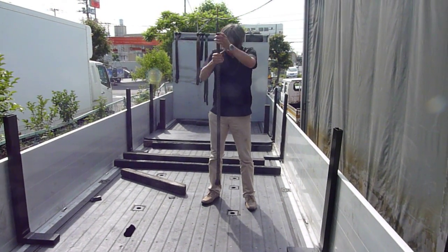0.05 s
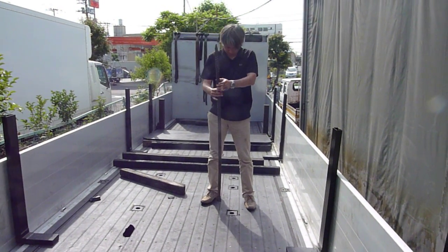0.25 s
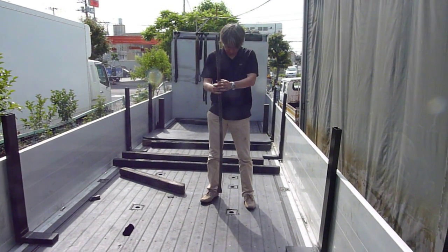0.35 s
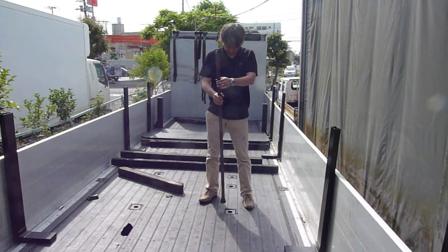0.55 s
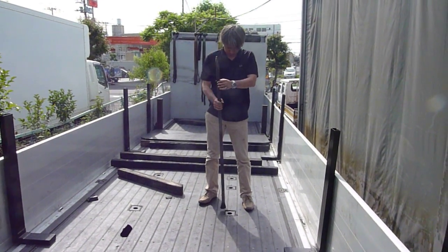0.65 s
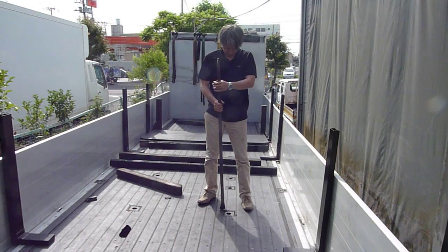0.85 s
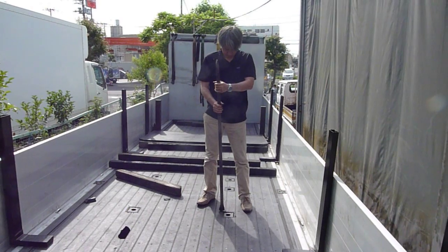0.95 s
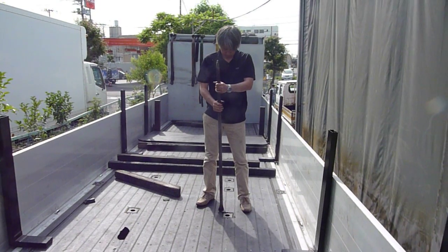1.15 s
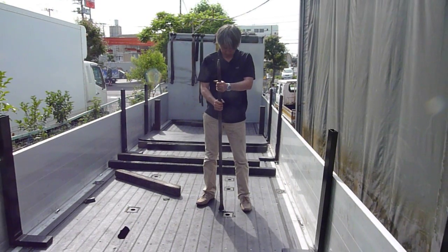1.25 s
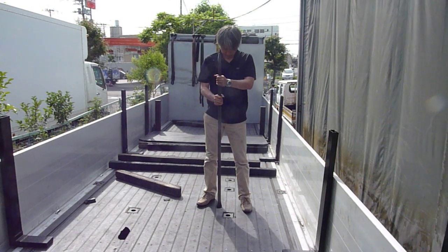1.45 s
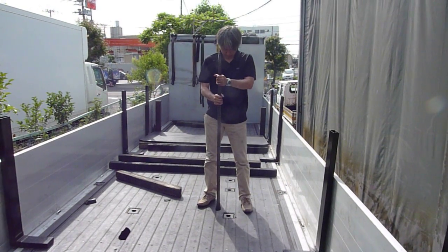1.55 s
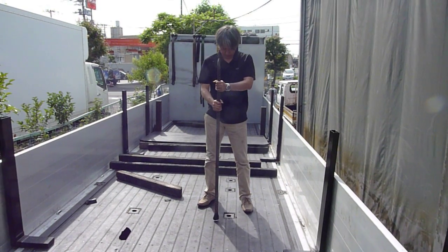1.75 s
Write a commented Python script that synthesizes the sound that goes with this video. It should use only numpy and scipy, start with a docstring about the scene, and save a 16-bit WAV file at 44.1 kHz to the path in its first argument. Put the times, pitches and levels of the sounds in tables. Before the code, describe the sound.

Two sharp, ringing clangs come in quick succession as a metal bar hits an open truck bed, close to the microphone. The panels shudder, the bar bounces with softer knocks, and far street traffic rumbles quietly behind.

```python
"""An empty truck bed by a street. A long steel bar is slammed twice, end first, onto the floor;
lighter knocks follow as the bar bounces and the bed settles. Each blow thumps the floor, cracks
steel on steel, sets the panels shuddering and leaves the bar ringing. The close microphone overloads,
and the recorder's recovering gain, written into the envelopes, holds up the ring after each blow.
Distant traffic with a faint whine and one small bird lie behind."""
import sys
import numpy as np
from scipy import signal
from scipy.fft import rfft, irfft
from scipy.io import wavfile

SR = 44100
rng = np.random.default_rng(int(sys.argv[2]) if len(sys.argv) > 2 else 0)


def waveform_to_disk(signal):
    """Save audio, clipped to [-1, 1], as 16-bit WAV at the path in sys.argv[1]."""
    frames = np.transpose(np.atleast_2d(signal))
    scaled = np.clip(frames, -1, 1) * 32767
    samples = np.round(scaled).astype(np.int16)
    wavfile.write(sys.argv[1], SR, samples)


N = 79380
T = np.arange(N) / SR
HZ = np.maximum(np.arange(N // 2 + 1) * SR / N, 1)
BAND_EDGES_HZ = np.geomspace(22, 9000, 22)
BAND_HZ = np.sqrt(BAND_EDGES_HZ[1:] * BAND_EDGES_HZ[:-1])


def from_db(db):
    """Decibels to gain."""
    return 10 ** (np.asarray(db) / 20)


def unit_rms(x):
    """Scale to rms 1."""
    return x / np.sqrt(np.mean(x ** 2) + 1e-20)


def at_hz(table, hz):
    """Read a table on a log-frequency axis."""
    table_hz, values = np.transpose(table)
    return np.interp(np.log(hz), np.log(table_hz), values)


def drift(rate_hz):
    """Smooth random motion, rms 1."""
    return unit_rms(irfft(rfft(rng.standard_normal(N)) / (1 + (HZ / rate_hz) ** 2), N))


def decay(start, t60):
    """Sudden onset, exponential decay."""
    return (T >= start) * from_db(-np.minimum(60 * np.maximum(T - start, 0) / t60, 200))


# Stereo width: (frequency [Hz], side minus mid [dB])
WIDTH = [(60, -21), (100, -28), (180, -27.5), (310, -30), (530, -23.5), (910, -15), (1570, -8.5),
         (2700, -5.5), (4650, -3.5), (8010, 0.5)]
# Stereo balance: (frequency [Hz], left minus right [dB])
BALANCE = [(100, 0.72), (1000, .6), (2000, 1), (4000, -0.5), (8000, 0)]

def stereo(mid, side, hz):
    """Mid and side to left and right; wider in the treble."""
    sign = np.array([[1], [-1]])
    return (mid + sign * side * from_db(at_hz(WIDTH, hz))) * from_db(sign * at_hz(BALANCE, hz) / 2)


def noise(gains):
    """Stereo noise shaped by a gain per frequency, rms 1."""
    mid, side = rfft(rng.standard_normal((2, N))) * gains
    return unit_rms(irfft(stereo(mid, side, HZ), N))


# Traffic spectrum: (frequency [Hz], relative density [dB])
TRAFFIC_SPECTRUM = [(15, -62), (25, -14), (60, -4), (146, -3.5), (331, -4.5), (411, -5.5), (475, -11),
                    (650, -12.5), (699, -10), (980, -15.5), (1370, -24), (4820, -36.5), (5440, -45),
                    (6760, -37), (8000, -54), (10400, -66), (17600, -120)]

def traffic(start_db=-42, fade_db_per_s=1):
    """Distant traffic rumbles, slowly fading."""
    return from_db(start_db - fade_db_per_s * T) * noise(from_db(at_hz(TRAFFIC_SPECTRUM, HZ)))


# Whine envelope: (time [s], level [dB])
WHINE_ENVELOPE = [(0, -50.5), (.2, -64), (1.1, -57.5), (1.22, -49), (1.44, -58), (1.58, -51), (1.8, -56.5)]

def whine(pitch_hz=966, waver=.004):
    """A faint, far tone wavers in pitch."""
    hz = pitch_hz * (1 + waver * drift(rate_hz=52))
    level_db = np.interp(T, *np.transpose(WHINE_ENVELOPE))
    return from_db(level_db) * np.sin(2 * np.pi * np.cumsum(hz) / SR)


# Floor modes: (frequency [Hz], blow 1 relative level [dB], blow 2 relative level [dB], t60 [s])
FLOOR_MODES = [(75, -38, -38, 0.054), (180.5, -24, -4.5, 0.081), (242.7, -9.5, 2.5, 0.067),
               (292, -3.5, -40, 0.039), (416, -43, -8, 0.047), (859, -5, -16, 0.036),
               (1015, -4.5, -36, 0.035), (1110, -18.5, -26.5, 0.04), (1990, -1, -2.5, 0.0073),
               (2630, 0.5, -13, .0022)]

def floor_thump(start, blow, contact_s=.0002):
    """The floor is pushed down and swings back in a few heavily damped modes."""
    age = np.maximum(T - start, 0)
    thump = 0
    for hz, *levels_db, t60 in FLOOR_MODES:
        thump -= from_db(levels_db[blow]) * np.sin(2 * np.pi * hz * age) * decay(start, t60)
    attack = 1 - np.exp(-age / contact_s)
    return stereo(thump * attack, side=0, hz=FLOOR_MODES[0][0])


# Steel impact spectrum: (frequency [Hz], relative density [dB])
CRACK_SPECTRUM = [(100, 14), (600, 5), (1400, -5), (2100, -0.5), (3300, -1.5), (4500, -14), (6500, -18),
                  (8000, -33.5)]

def crack(start, clatter_db=-6):
    """Steel meets steel: a sharp crack and a brief clatter."""
    envelope = decay(start, t60=.018) + from_db(clatter_db) * decay(start, t60=.11)
    return noise(from_db(at_hz(CRACK_SPECTRUM, HZ))) * envelope


def panel_modes(relative_spacing=.008, noise_share=.5):
    """Gain per frequency: hundreds of close, random panel modes over even noise."""
    density = np.minimum(SR / N / (relative_spacing * HZ), 1)
    is_mode = rng.random(len(HZ)) < density
    return np.sqrt(noise_share + (1 - noise_share) * is_mode / density)


# Panel spectrum: (frequency [Hz], relative density [dB])
PANEL_SPECTRUM = [(30, -39), (55, -1), (110, -0.5), (170, -1.5), (290, 3), (450, -5), (750, -8),
                  (1200, -13), (2200, -23.5), (3500, -27.5), (5000, -33), (7500, -41.5)]
# Apparent panel decay while the recorder's gain recovers: (frequency [Hz], t60 [s])
APPARENT_DECAY = [(60, 4), (250, 1.6), (800, 1.24), (2500, 1.35), (7000, 1.02)]

def panel_shudder(modes, start, colour_db, recovery_s, attack_s=.0074, fall_db_per_s=76, rattle_db=1.34):
    """Panels shudder and rattle; recovering recorder gain holds them up, then they fall to a yard echo."""
    age = np.maximum(T - start, 0)
    fall = from_db(-fall_db_per_s * np.maximum(age - recovery_s, 0))
    rattle = from_db(rattle_db * drift(rate_hz=95))
    yard_echo = from_db(-16) * decay(start, t60=.97)
    gains = from_db(at_hz(PANEL_SPECTRUM, BAND_HZ) + colour_db) * np.sqrt(np.diff(BAND_EDGES_HZ))
    gains /= np.linalg.norm(gains)
    out = 0
    for low, high, hz, gain in zip(BAND_EDGES_HZ, BAND_EDGES_HZ[1:], BAND_HZ, gains):
        band = noise(modes * (HZ >= low) * (HZ < high))
        shudder = decay(start, at_hz(APPARENT_DECAY, hz)) * fall * rattle
        out += gain * band * np.hypot(shudder, yard_echo)
    return out * (1 - np.exp(-age / attack_s))


# Bar modes: (frequency [Hz], blow 1 relative peak [dB], blow 2 relative peak [dB],
# gain recovery [s], t60 [s])
BAR_MODES = [(1796, -51, -37, .18, .62), (1895, -59, -43, .24, .45), (2207, -50, -43, .18, .55),
             (2832, -55, -49, .05, .45), (3138, -56, -48, .12, .55), (3534, -44, -48, .36, .65),
             (3666, -55, -47, .22, .38), (3943, -51, -61, .33, .35), (4188, -68, -52, .21, .3),
             (4560, -55, -68, .28, .4), (4760, -53, -50, .09, .5), (5277, -41, -59, .14, .75),
             (5846, -55, -68, .16, .65), (6303, -52, -73, .21, .6), (7192, -57, -78, .24, .5),
             (7994, -58, -92, .14, .55)]

def bar_ring(start, blow, recovery_db_per_s=41, flutter_db=1.64, mean_beat_hz=13, beat_depth=.55):
    """The bar's ring grows as the recorder's gain recovers, then dies; modes beat with close twins."""
    age = np.maximum(T - start, 0)
    side_gain = from_db(-1.5 - at_hz(WIDTH, BAR_MODES[-1][0]))
    draws = rng.random((len(BAR_MODES), 4))
    out = 0
    for mode, (offset, detune, twin_offset, side_offset) in zip(BAR_MODES, draws):
        hz, *peaks_db, recovery_s, t60 = mode
        recorder_db = -recovery_db_per_s * np.maximum(recovery_s - age, 0)
        decay_db = -60 * np.maximum(age - recovery_s, 0) / t60
        level_db = peaks_db[blow] + recorder_db + decay_db + flutter_db * drift(rate_hz=17)
        phase = 2 * np.pi * (hz * age + offset)
        twin_phase = phase + 2 * np.pi * (mean_beat_hz * (.5 + detune) * age + twin_offset)
        mid = np.sin(phase) + beat_depth * decay(start, t60=1.1) * np.sin(twin_phase)
        side = side_gain * np.sin(phase + 2 * np.pi * side_offset)
        out += (T >= start) * from_db(level_db) * stereo(mid, side, hz)
    return out


# Bar blows: (time [s], thump gain [dB], crack gain [dB], panel gain [dB], panel tilt [dB/octave],
# recorder gain recovery [s], panel low cut [Hz], bar gain [dB])
BLOWS = [(.2272, 0.5, -7.5, -18.5, 1, 0.31, 45.8, 2), (.6497, 0, -14, -18, -1.5, 0.29, 123, 2.5)]

def blows(modes, contact_loss_db=1):
    """The bar strikes the bed; a new blow slightly damps its earlier ring."""
    bed, bar = np.zeros((2, N)), np.zeros((2, N))
    for blow, row in enumerate(BLOWS):
        start, thump_db, crack_db, panel_db, tilt, recovery_s, low_hz, bar_db = row
        bar *= from_db(-contact_loss_db * (T >= start))
        bar += from_db(bar_db) * bar_ring(start, blow)
        bed += from_db(thump_db) * floor_thump(start, blow)
        bed += from_db(crack_db) * crack(start)
        colour_db = tilt * np.log2(BAND_HZ) - 10 * np.log10(1 + (low_hz / BAND_HZ) ** 4)
        bed += from_db(panel_db) * panel_shudder(modes, start, colour_db, recovery_s)
    return bed + bar


# Light contacts: (time [s], knock gain [dB], panel gain [dB], high cut [Hz])
KNOCKS = [(0.389, -9, -43.5, 180), (.7925, -12, -24.5, 2484), (.856, -28, -27.5, 219),
          (1.047, -21, -40, 202), (1.125, -38, -40, 200)]

def knocks(modes, tilt_db_per_octave=1.5):
    """The bar bounces and the bed settles: soft, brief contacts that stir the panels."""
    spectrum = from_db(at_hz(PANEL_SPECTRUM, HZ) + tilt_db_per_octave * np.log2(HZ))
    out = 0
    for start, knock_db, panel_db, high_hz in KNOCKS:
        burst = noise(spectrum) * decay(start, t60=.042)
        out += from_db(knock_db) * signal.sosfilt(signal.butter(4, high_hz, fs=SR, output="sos"), burst)
        colour_db = tilt_db_per_octave * np.log2(BAND_HZ) - 10 * np.log10(1 + (BAND_HZ / high_hz) ** 6)
        out += from_db(panel_db) * panel_shudder(modes, start, colour_db, recovery_s=.082)
    return out


# Bird note: (time [s], pitch [Hz], level [dB])
BIRD_NOTE = [(1.38, 6750, -80), (1.42, 6850, -69), (1.45, 6700, -70), (1.48, 6400, -75), (1.52, 6350, -90)]

def bird():
    """A small bird gives one high, falling note."""
    times, hz, db = np.transpose(BIRD_NOTE)
    envelope = from_db(np.interp(T, times, db, left=-200, right=-200))
    return envelope * np.sin(2 * np.pi * np.cumsum(np.interp(T, times, hz)) / SR)


def scene():
    """Blows and knocks on the same panels, with the street behind."""
    modes = panel_modes()
    return blows(modes) + knocks(modes) + whine() + traffic() + bird()


def record(dry, low_hz=46, high_hz=8050, knee=5.1, cutoff_hz=16000):
    """A narrow-band microphone overloads with a tight knee; the highest overtones are cut."""
    narrow = signal.sosfilt(signal.ellip(10, .3, 70, high_hz, fs=SR, output="sos"), dry)
    narrow = signal.sosfilt(signal.butter(3, low_hz, "high", fs=SR, output="sos"), narrow)
    clipped = narrow / (1 + np.abs(narrow) ** knee) ** (1 / knee)
    return signal.sosfilt(signal.cheby2(12, 70, cutoff_hz, fs=SR, output="sos"), clipped)


dry = scene()
out = record(dry)
waveform_to_disk(out)
```